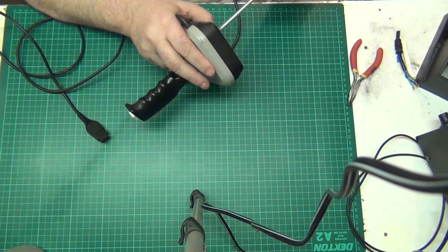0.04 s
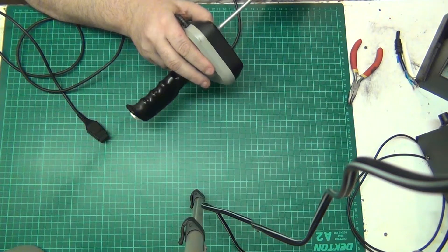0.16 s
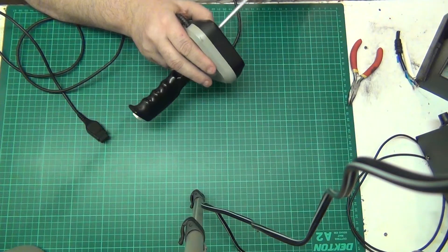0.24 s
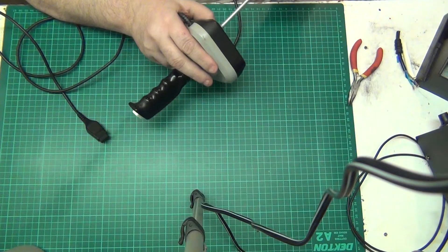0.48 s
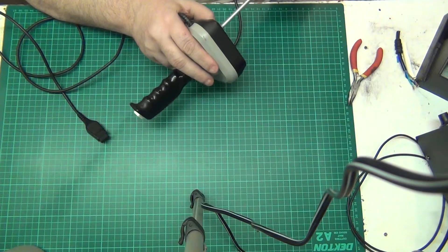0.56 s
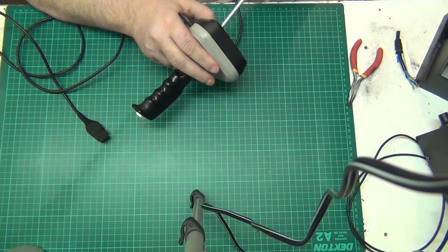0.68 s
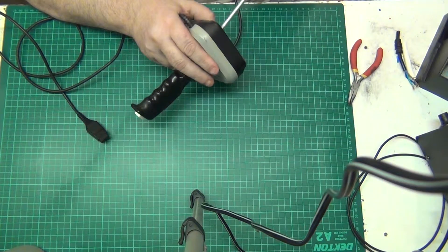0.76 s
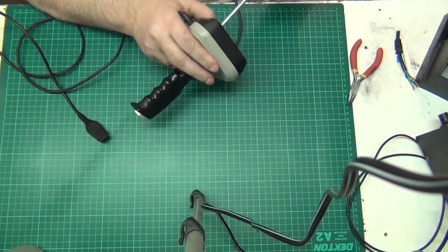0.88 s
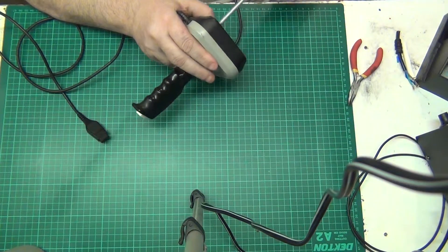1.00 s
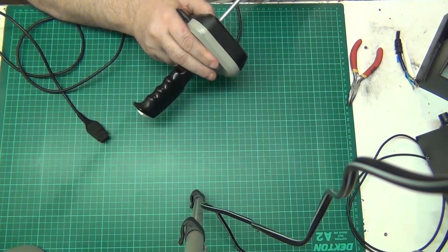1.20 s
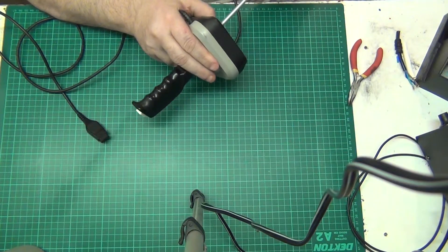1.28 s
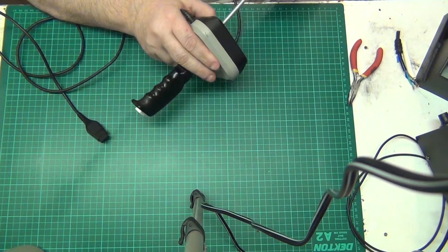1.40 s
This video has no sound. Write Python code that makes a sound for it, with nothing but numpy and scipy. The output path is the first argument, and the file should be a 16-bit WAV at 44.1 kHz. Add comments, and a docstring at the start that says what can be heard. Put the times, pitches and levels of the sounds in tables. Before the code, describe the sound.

A plastic joystick gives one sharp snap as a thin steel tool works at its base. Faint creaks and a tiny squeak follow, then a lighter click and a soft, dull knock, heard close in a small, quiet room.

```python
"""At a work table in a small dry room, a thin steel tool works at the base of a plastic joystick.
The shell gives one sharp snap, a catch a lighter click and small ticks, the hollow base a dull knock:
each is a crack of noise plus the ringing of that part, with the tool ringing faintly along.
Between them the plastic sticks and slips in short creaks and one squeak.
The room answers briefly, over quiet room noise, mains hum and a faint electronic whine."""
import sys
import numpy as np
from scipy import signal
from scipy.fft import rfft, irfft
from scipy.io import wavfile

SR = 44100
rng = np.random.default_rng(int(sys.argv[2]) if len(sys.argv) > 2 else 0)


def store_wav(level_fs):
    """Save 16-bit WAV to argv[1]."""
    pcm = np.round(np.clip(np.atleast_2d(level_fs), -1, 1) * 32767)
    wavfile.write(sys.argv[1], SR, pcm.T.astype(np.int16))


N = 63945

# Modes of the plastic shell. Each row: pitch in Hz, level in dB, ring time (t60) in seconds.
SHELL_MODES = [(398, -8, 0.042), (506, -11, 0.095), (852, -13, 0.072), (1084, -5, 0.026), (1226, -5, 0.043),
               (1400, -10.5, 0.016), (1660, -13, 0.078), (2304, -8.5, 0.016), (3090, -2.5, 0.014),
               (3493, -8, 0.024), (4265, 5, 0.0074), (6650, -3.5, 0.0056), (7300, -3, 0.014),
               (10360, -9, 0.007)]


def undb(db):
    """Decibels to gain."""
    return 10 ** (np.asarray(db) / 20)


def bins():
    """Frequencies of the spectrum in Hz."""
    return np.arange(N // 2 + 1) * SR / N


def curve(points):
    """Draw a curve across the spectrum through (Hz, value) points, on a log-frequency axis."""
    hz, values = np.array(points, float).T
    return np.interp(np.log(bins() + 1), np.log(hz), values)


def colour(points):
    """Turn (Hz, dB) points into an EQ curve of unit power."""
    gain = undb(curve(points))
    return gain / np.sqrt(np.mean(gain ** 2))


def noise(gain):
    """Noise with the given gain at each frequency."""
    return irfft(rfft(rng.standard_normal(N)) * gain, N)


def fade(t, t60):
    """Exponential decay by 60 dB in t60 seconds."""
    return np.exp(-np.log(1000) * t / t60)


def swell(start, length):
    """A half-sine envelope: pressure builds and lets go."""
    return np.sin(np.pi * np.clip((np.arange(N) / SR - start) / length, 0, 1))


def stereo(mid, side):
    """Left and right from mid and side."""
    return np.array([mid + side, mid - side])


def contact(hz, centre_hz, octaves):
    """How strongly a contact drives each frequency: a bell on the octave axis."""
    return np.exp(-.5 * (np.log2((hz + 1) / centre_hz) / octaves) ** 2)


def ring(modes, age, centre_hz, octaves):
    """A struck part rings in decaying sines, each as strong as the contact drives it."""
    phases = rng.uniform(0, 2 * np.pi, len(modes))
    out = np.zeros(N)
    for (hz, db, t60), phase in zip(modes, phases):
        drive = undb(db) * contact(hz, centre_hz, octaves)
        out += drive * fade(age, t60) * np.sin(2 * np.pi * hz * age + phase)
    return out


def clicks():
    """Each contact cracks briefly and rings a plastic part and the tool; returns cracks and rings."""
    # The contacts. Each row: start in seconds, part that rings, level in dB, tone centre in Hz,
    # spread in octaves, crack trim in dB.
    hits = [(0.0375, "shell", -55, 3500, 1.8, 2), (0.2393, "shell", -19, 2000, 2.8, 1),
            (0.2413, "shell", -27, 4500, 1.8, 2), (0.2446, "shell", -26, 1000, 1.0, 0),
            (0.8776, "catch", -30, 3100, 1.6, 1), (0.8828, "catch", -37.5, 1900, 1.3, 1),
            (1.049, "catch", -57, 2200, 1.1, 0), (1.221, "catch", -56, 2800, 1.5, 2),
            (1.3048, "base", -44.5, 1700, 1.9, 1), (1.3105, "base", -43.5, 880, .8, -4)]
    # Modes of the small inner catch, the hollow base and the steel tool.
    # Each row: pitch in Hz, level in dB, ring time (t60) in seconds.
    catch_modes = [(430, -2, .02), (522, 4, .03), (1160, -6, .03), (1370, -4, .026), (1897, -7, .035),
                   (2050, -9, .03), (2840, -5, .018), (3070, 0, .019), (3250, -3, .017), (3660, -3, .017),
                   (4620, -10, .022), (6040, -8, .018), (7780, -12, .018)]
    base_modes = [(553, -9, 0.068), (740, 4.5, 0.037), (808, -3, .06), (1240, -9.5, 0.058),
                  (1443, 0.5, 0.049), (1965, -3, 0.034), (3150, -29, 0.0095), (5520, -6.5, 0.026)]
    tool_modes = [(791, -18, .15), (1125, -20, .13), (1933, -26, .14), (2260, -28, .11), (4100, -30, .11)]
    # Colour of the crack. Each row: frequency in Hz, relative level in dB.
    crack_eq = [(100, -23), (170, -4), (260, -15), (340, -9), (500, 11.5), (1100, 7), (1900, 9.5),
                (2800, 8), (4200, 7), (5300, 0), (8000, 1), (11000, -1.5), (15000, -13.5)]
    parts = {"shell": SHELL_MODES, "catch": catch_modes, "base": base_modes}
    rise_s, crack_hold_s = .0006, .0028
    crack_db, plastic_db, tool_db = -5.5, 1.5, -2
    t, cracks, rings = np.arange(N) / SR, np.zeros(N), np.zeros(N)
    for start, part, db, centre_hz, octaves, trim_db in hits:
        age = np.maximum(t - start, 0)
        attack = undb(db) * (1 - np.exp(-age / rise_s))
        burst = noise(colour(crack_eq) * contact(bins(), centre_hz, octaves))
        decay = fade(np.maximum(age - crack_hold_s, 0), t60=.017)
        cracks += attack * undb(crack_db + trim_db) * burst * decay
        plastic = undb(plastic_db) * ring(parts[part], age, centre_hz, octaves)
        steel = undb(tool_db) * ring(tool_modes, age, centre_hz, octaves)
        rings += attack * (plastic + steel)
    return cracks, rings


def creaks():
    """Short runs of tiny uneven slips, coloured by the shell's resonances."""
    # Creaks as the tool turns. Each row: start in seconds, length in seconds, level in dB,
    # tone centre in Hz, spread in octaves.
    turns = [(0.232, .011, -46, 1500, 2.2), (0.565, .028, -55.5, 680, .75), (0.680, .032, -57, 1500, 1.2),
             (0.848, .036, -56, 2400, 1.8)]
    slips_per_s = 2500
    hz, out = bins(), np.zeros(N)
    shell = sum(undb(db) / (np.log(1000) / t60 + 2j * np.pi * (hz - mode_hz))
                for mode_hz, db, t60 in SHELL_MODES)
    for start, length, db, centre_hz, octaves in turns:
        slips = (rng.random(N) < slips_per_s / SR) * rng.standard_normal(N)
        friction = slips * swell(start, length)
        creak = irfft(rfft(friction) * shell * contact(hz, centre_hz, octaves), N)
        out += undb(db) * creak * np.sqrt(length * SR / (np.sum(creak ** 2) + 1e-18))
    return out


def squeak():
    """Plastic sticks and slips for a moment on one thin, unsteady pitch."""
    pitch_hz, peak_db = 2040, -52.5
    jitter, waver_hz = .028, 397
    waver = noise(bins() < waver_hz)
    hz = pitch_hz * (1 + jitter * waver / np.std(waver))
    return undb(peak_db) * swell(start=.681, length=.03) * np.sin(2 * np.pi * np.cumsum(hz) / SR)


def room(send):
    """Dense, short reflections from table and walls, dying a little sooner in the treble."""
    # Reverb bands. Each row: frequency in Hz, level in dB, decay time (t60) in seconds.
    bands = [(150, -3, .27), (400, -3.5, .23), (1100, -.5, .23), (2200, -5, .22), (3200, -9, .2),
             (4400, -5, .23), (5500, -8, .23), (8000, -7, .23), (15000, -7, .22)]
    predelay_s, build_s = .003, .003
    return_db, side_db = 1.2, -6
    age, response = np.maximum(np.arange(N) / SR - predelay_s, 0), 0
    for band_hz, db, t60 in bands:
        band = np.sqrt(curve([(hz, hz == band_hz) for hz, _, _ in bands]))  # equal-power crossover
        tail = (1 - np.exp(-age / build_s)) * fade(age, t60)
        tail /= np.sqrt(np.sum(tail ** 2))
        response += undb(db) * tail * stereo(noise(band), undb(side_db) * noise(band))
    return undb(return_db) * signal.fftconvolve(send[None], response, axes=1)[:, :N]


def room_tone():
    """Steady room noise, narrowest in the bass, with mains hum and a faint electronic whine."""
    # Colour of the noise. Each row: frequency in Hz, relative level in dB.
    air_eq = [(20, -16), (35, -9), (60, 0), (130, 1), (250, -1), (500, -3), (1100, -5.5), (2000, -10.5),
              (4000, -14.5), (6000, -16.5), (9650, -16), (10050, -7.5), (10400, -16), (15500, -17.5)]
    # Its stereo width. Each row: frequency in Hz, side level against the mid in dB.
    air_width = [(70, -21), (160, -14), (8000, -12.5)]
    # Hum and whine. Each row: pitch in Hz, RMS level in dB.
    tones = [(100, -65.5), (15625, -76)]
    air_db = -56.2
    t = np.arange(N) / SR
    mid = noise(colour(air_eq))
    side = noise(colour(air_eq) * undb(curve(air_width)))
    hum_and_whine = sum(undb(db) * np.sqrt(2) * np.sin(2 * np.pi * hz * t) for hz, db in tones)
    return undb(air_db) * stereo(mid, side) + hum_and_whine


def scene():
    """The joystick just left of centre, its reflections and the quiet room."""
    body_send_db, low_cut_hz, lean_left_db = -9, 43, .3
    cracks, rings = clicks()
    body = rings + creaks() + squeak()
    joystick = cracks + body + room(cracks + undb(body_send_db) * body)
    low_cut = signal.butter(2, low_cut_hz, "high", fs=SR, output="sos")
    pan = undb([[lean_left_db / 2], [-lean_left_db / 2]])
    return pan * signal.sosfilt(low_cut, joystick) + room_tone()


def record(dry):
    """A steep high cut takes off the very top."""
    high_cut_hz = 15850
    return signal.sosfilt(signal.ellip(10, .2, 70, high_cut_hz, fs=SR, output="sos"), dry)


dry = scene()
out = record(dry)
store_wav(out)
```